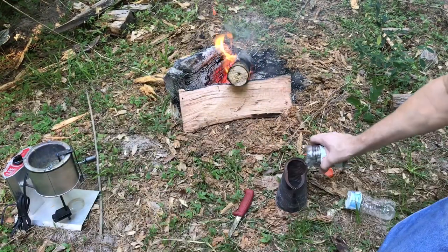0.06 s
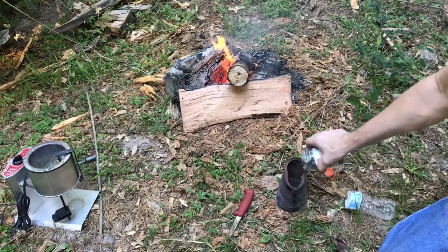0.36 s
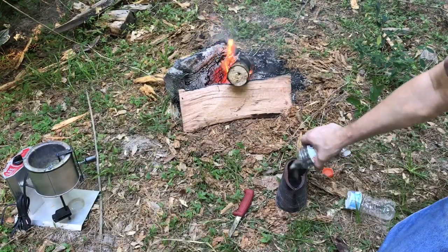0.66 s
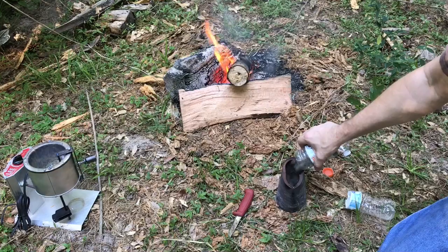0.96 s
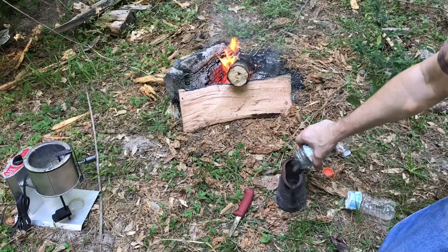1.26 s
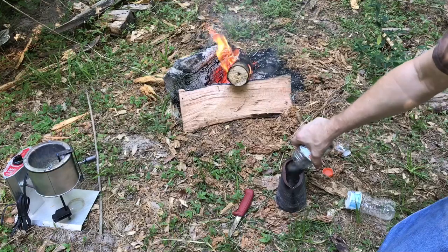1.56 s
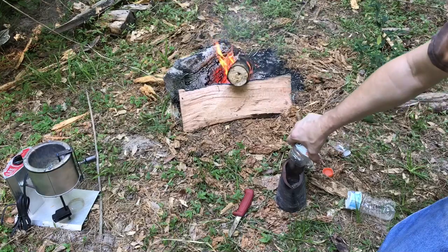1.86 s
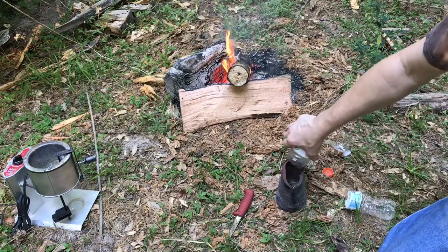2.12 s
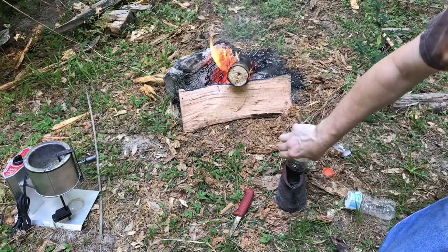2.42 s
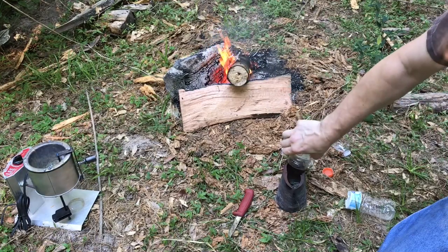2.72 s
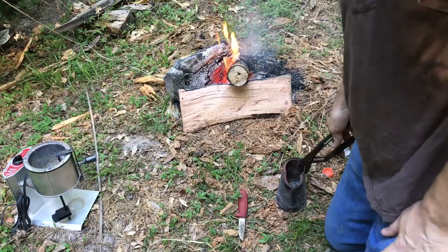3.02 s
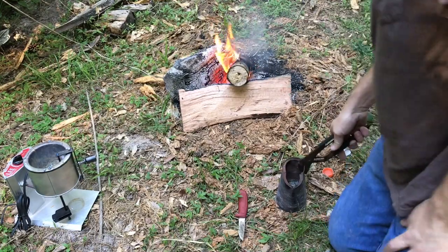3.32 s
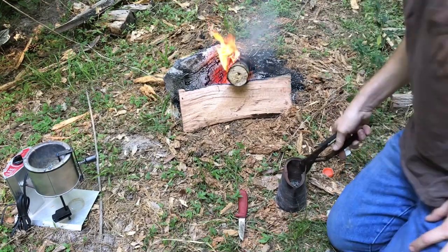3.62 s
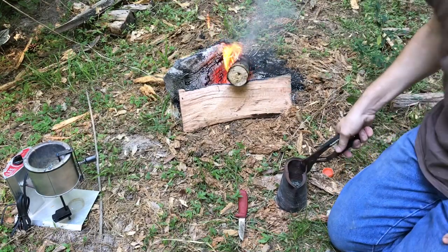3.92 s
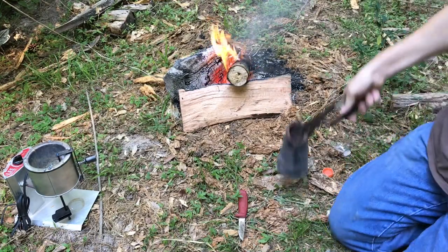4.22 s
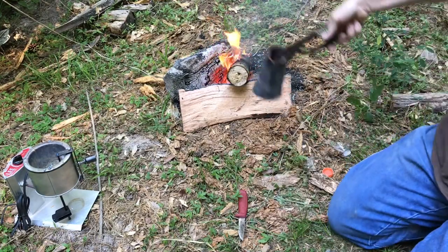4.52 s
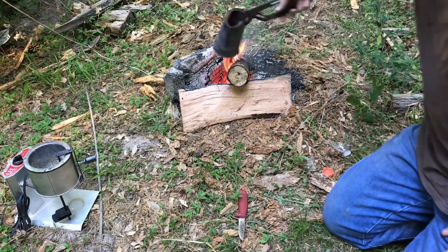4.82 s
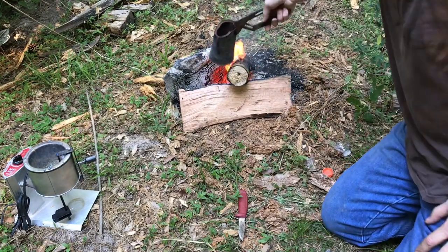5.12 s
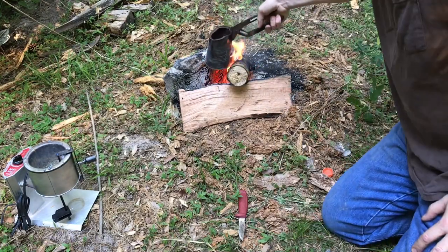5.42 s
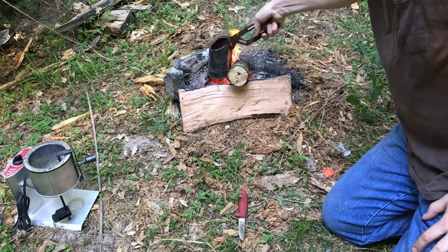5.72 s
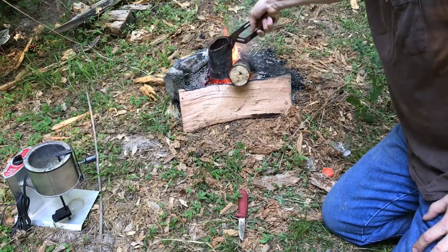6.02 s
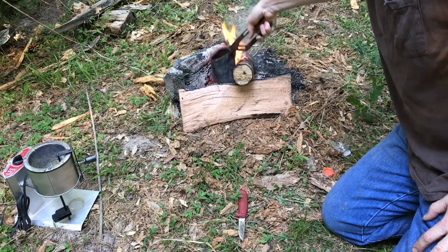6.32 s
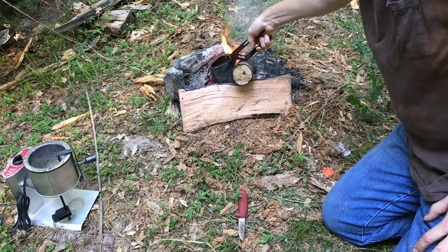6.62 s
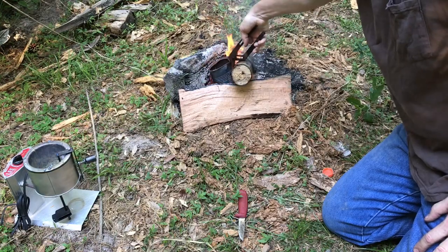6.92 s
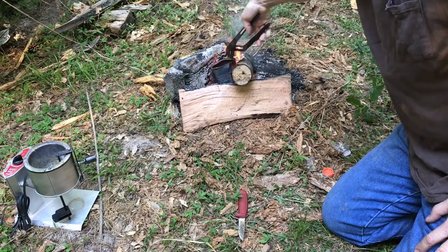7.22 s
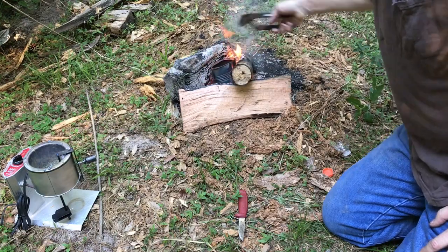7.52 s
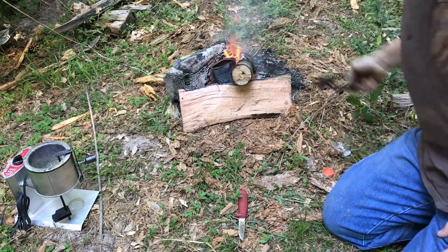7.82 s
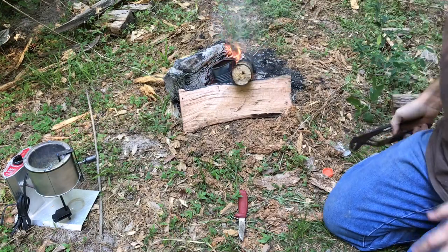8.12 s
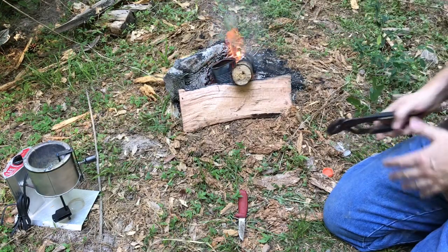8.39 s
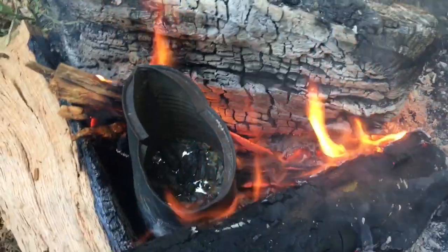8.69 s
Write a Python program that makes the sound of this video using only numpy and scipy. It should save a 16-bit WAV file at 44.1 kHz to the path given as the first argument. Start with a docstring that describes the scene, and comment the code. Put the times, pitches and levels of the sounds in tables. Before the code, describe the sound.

Outdoors, small metal weights pour from a bottle into a heavy metal can with a bright, dense clatter that thins to a few stray clicks. Pliers clink lightly on the can, clothes rustle, and the can crunches into charcoal and knocks against logs. A small wood fire snaps now and then, and a distant bird calls faintly over soft outdoor air. The handling sounds are near and fairly dry.

```python
"""Lead weights pour from a bottle and clatter into a heavy metal can, each impact exciting its modes.
Pliers grip the can, clothes rustle, and the can is carried to a small wood fire and worked down into
the embers, grinding charcoal and knocking on logs. The wood snaps as it burns, and a far bird calls over
outdoor air, a low hum and a drone. At the very end the flames rumble close by."""
import sys
import numpy as np
from scipy import signal
from scipy.fft import rfft, irfft, next_fast_len
from scipy.io import wavfile
from scipy.ndimage import uniform_filter1d

SR = 44100
rng = np.random.default_rng(int(sys.argv[2]) if len(sys.argv) > 2 else 0)


def put_to_file(sound):
    """Save the sound as 16-bit audio at rate SR, in the file named by the first command-line argument."""
    columns = np.atleast_2d(sound).T  # one column per channel
    safe = np.clip(columns, -1, 1)
    whole_steps = np.round(safe * 32767)
    wavfile.write(sys.argv[1], SR, whole_steps.astype(np.int16))


N = 386051
TIME = np.arange(N) / SR
HIT_TIME = TIME[:SR // 8]

# Levels are relative within a table; the functions apply further gains.
# spectra of the noises and impacts: frequency_hz, gain_db
AIR_SPECTRUM = [(30, -14.5), (75, -0.5), (161, -11.5), (461, -18.5), (889, -14.5), (2410, -30),
                (3870, -26.5), (4420, -29), (4910, -33), (9220, -30.5), (10500, -35.5), (16000, -32.5)]
FLAME_SPECTRUM = [(25, -7.5), (65, 0), (210, -24.5), (480, -29), (600, -45.5)]
CLOTH_SPECTRUM = [(1400, -1), (3600, 4.5), (12600, 3), (16000, -7)]
CHARCOAL_SPECTRUM = [(2100, -7), (3900, -4), (4800, -7), (6200, 0.5), (9000, 4.5), (12700, 3.5),
                     (15700, -1)]
CLASH_SPECTRUM = [(1200, -20.5), (2050, -5), (2500, -3), (4200, 0.5), (5000, -7), (6000, 1), (7000, -2),
                  (7800, -5.5), (9000, -4.5), (12000, -4), (15500, -8.5)]
THUD_SPECTRUM = [(190, -16), (450, -1), (800, -11), (1550, 0.5), (2000, -7)]

# resonances: pitch_hz, bandwidth_hz, gain_db
DRONE_BANDS = [(372.4, 16.3, 9.5), (720, 167, 1), (1017, 480, -4.5)]
INSECT_BANDS = [(4250, 340, 0.5), (11570, 1000, -5.5)]
LOG_MODES = [(610, 110, -2), (810, 70, 2), (1420, 200, -10), (3100, 250, -11)]
PLIER_MODES = [(3180, 120, -5), (3950, 180, 1), (6250, 600, -2), (8850, 800, 0)]
HELD_CAN_MODES = [(540, 60, 2), (605, 70, -2), (850, 150, -11), (1420, 140, -8), (1850, 260, -12)]  # the loaded can in the pliers
CAN_MODES = [(466, 42, 4.5), (590, 60, 3), (698, 45, 0), (912, 35, 0), (1013, 40, -1.5), (1190, 70, -3.5),
             (1393, 100, -1), (1530, 140, 0.5), (1741, 40, -5), (1875, 30, -6)]  # can and bottle during the pour
CLIP_MODES = [(2349, 35, -1), (2470, 70, -2), (2650, 100, 3), (2822, 50, -1), (3525, 40, 0), (3885, 50, -1),
              (6874, 130, -1), (8235, 30, 1), (9265, 55, -2), (9690, 100, -2)]  # the weights and their steel clips

# envelopes: time_s, level_db
AIR_LEVELS = [(8.5, -56.5), (8.56, -64)]
HUM_LEVELS = [(2.7, -60.5), (3.3, -55), (7, -51.5), (7.8, -57.5)]
DRONE_LEVELS = [(2.8, -66.5), (7, -61.5), (8.52, -68)]
FLAME_LEVELS = [(8.53, -74.5), (8.56, -47), (8.72, -44)]
FLOW_LEVELS = [(0.6, -59.5), (0.77, -47.5), (0.88, -43.5), (1.0, -34.5), (1.22, -32.5), (1.28, -48.5),
               (1.4, -41), (1.8, -40), (2.0, -88), (2.14, -56), (2.32, -84)]  # weights sliding out of the bottle

# movements: start_s, end_s, level_db
CLOTH_SWISHES = [(0.16, 0.33, -55.5), (2.98, 3.22, -48), (3.31, 3.49, -51), (3.5, 3.95, -55.5),
                 (3.95, 4.7, -61.5)]
CHARCOAL_SHOVES = [(5.64, 5.98, -53), (5.99, 6.32, -50), (6.25, 6.64, -45), (6.74, 6.83, -50),
                   (6.84, 7.0, -44.5), (6.99, 7.26, -42.5)]
LOAD_RATTLES = [(2.9, 3.2, -57.5), (4.45, 5.0, -59.5)]

# bird calls: start_s, level_db
BIRD_CALLS = [(1.88, -49), (2.28, -54.5), (2.64, -54), (4.38, -53.5), (5.405, -55.5), (5.75, -54),
              (6.64, -54), (6.88, -58)]
# snaps of burning wood, charcoal and twigs: start_s, level_db, pitch_hz
WOOD_SNAPS = [(0.1037, -26, 7100), (0.6595, -19, 5800), (2.217, -26.5, 2170), (3.446, -29, 3840),
              (3.579, -31.5, 4000), (3.712, -30, 2900), (3.875, -36, 7000), (4.0157, -37, 2990),
              (4.5239, -31, 6540), (6.082, -31.5, 4100), (6.3776, -21.5, 5750), (6.436, -30, 6000),
              (6.6085, -23, 3860), (6.795, -35, 5150), (6.8667, -23, 9100), (7.043, -30, 3970),
              (7.0998, -26, 3800), (7.546, -23.5, 5840)]
# stray weights shifting in the bottle and can: start_s, clash_db
STRAY_WEIGHTS = [(0.211, -36), (0.262, -45.5), (0.486, -33.5), (2.083, -33.5), (2.189, -38.5), (2.246, -41),
                 (2.284, -38), (2.455, -41), (2.748, -36.5), (2.805, -41.5)]
# weights landing in the can: start_s, clash_db
WEIGHT_DROPS = [(0.788, -18), (0.798, -13), (0.826, -18), (0.8965, -4), (0.9506, -9.5), (0.965, -6.5),
                (0.9759, -5), (0.998, -16.5), (1.058, -15.5), (1.0863, -15.5), (1.0933, -16.5),
                (1.127, -17.5), (1.1458, -18), (1.1817, -20), (1.2084, -12), (1.224, -18), (1.295, -14),
                (1.303, -15.5), (1.3384, -21.5), (1.345, -14), (1.372, -21.5), (1.454, -19.5),
                (1.478, -20.5), (1.495, -25.5), (1.5838, -22.5), (1.6179, -21), (1.6592, -13),
                (1.7021, -18), (1.719, -13.5), (1.7507, -20.5), (1.817, -35), (1.863, -23), (1.903, -17),
                (1.916, -15), (1.94, -23.5), (1.984, -16.5), (2.045, -18)]
# impacts and the struck body's answer: start_s, contact_db, body_db
PLIER_KNOCKS = [(2.887, -29.5, -65), (2.9143, -29.5, -53.5), (3.0114, -25.5, -53), (3.1494, -51, -50.5),
                (3.2864, -38.5, -49.5), (4.2327, -44, -47), (4.574, -43.5, -48), (4.7, -50, -50.5),
                (4.872, -46.5, -52.5), (5.2955, -28.5, -40.5), (5.6243, -32, -57), (5.881, -20.5, -65),
                (5.894, -25.5, -47), (6.4883, -25.5, -60), (6.758, -27, -49.5), (6.8823, -31, -51)]  # can against pliers; the soft knocks at 4.5-4.9 s are the load shifting inside the carried can
LOG_LANDINGS = [(7.1434, -20.5, -29), (7.1986, -30.5, -37)]  # can onto logs
WALL_HITS = [(0.836, -17, -21), (0.905, -2.5, -13), (0.939, -19.5, -22), (1.234, -16, -23.5)]  # weights against the bare can wall
# brief dips of the whole sound: time_s
LEVEL_DIPS = [2.869, 8.535]


def from_db(db):
    """Amplitude grows tenfold with every 20 dB."""
    return 10 ** (np.asarray(db) / 20)


def unit_rms(x):
    """Normalisation to unit mean power."""
    return x / np.sqrt(np.mean(x ** 2) + 1e-20)


def as_hit(x):
    """Normalisation to the energy of ten milliseconds at unit rms."""
    return x / np.sqrt(np.sum(x ** 2) / (SR / 100) + 1e-20)


def level(rows):
    """An envelope interpolated in amplitude, silent outside its rows."""
    times, db = np.transpose(rows)
    return np.interp(TIME, times, from_db(db), left=0, right=0)


def held_level(rows):
    """An envelope interpolated in decibels, held at both ends."""
    return from_db(np.interp(TIME, *np.transpose(rows)))


def strokes(rows):
    """Half-sine envelopes: friction noise swells and fades with the speed of a stroke."""
    return sum(from_db(db) * np.sin(np.pi * np.clip((TIME - start) / (end - start), 0, 1))
               for start, end, db in rows)


def drift(per_s):
    """Random modulation of unit rms, interpolated between knots."""
    knots = rng.standard_normal(4000)
    return unit_rms(np.interp(TIME * per_s, np.arange(len(knots)), knots))


def add(out, start_s, sound):
    """Superposition: a sound adds to the mix from its start time."""
    start = int(start_s * SR)
    out[start:start + len(sound)] += sound[:N - start]


def colour(x, spectrum):
    """A minimum-phase filter follows the spectrum and falls 18 dB per octave outside it."""
    size = next_fast_len(len(x) + SR // 10) // 2 * 2
    octave = np.log2(np.maximum(np.fft.rfftfreq(size, 1 / SR), 5))
    hz, db = np.transpose(spectrum)
    outside = np.abs(octave - np.clip(octave, np.log2(hz[0]), np.log2(hz[-1])))
    gain_db = np.interp(octave, np.log2(hz), db) - 18 * np.minimum(outside, 3)
    cepstrum = irfft(np.log(from_db(gain_db)))
    cepstrum[1:size // 2] *= 2  # folding the cepstrum makes the filter causal
    cepstrum[size // 2 + 1:] = 0
    return irfft(np.exp(rfft(cepstrum)) * rfft(x, size))[:len(x)]


def resonate(x, modes):
    """Modal response: damped resonators in parallel, of alternating sign."""
    out = 0
    for k, (hz, width_hz, db) in enumerate(modes):
        radius = np.exp(-np.pi * width_hz / SR)
        gain = (-1) ** k * from_db(db) * (1 - radius ** 2) / 2
        feedback = [1, -2 * radius * np.cos(2 * np.pi * hz / SR), radius ** 2]
        out = out + gain * signal.lfilter([1, 0, -1], feedback, x + 1e-18)
    return out


def random_modes(low_hz, high_hz, width_hz, count):
    """An irregular piece has inharmonic modes, drawn here on a log-frequency scale."""
    return [(hz, width_hz, 0) for hz in low_hz * (high_hz / low_hz) ** rng.random(count)]


def grains(per_s, spread_db, size=N):
    """Shot noise: independent tiny contacts of uneven strength."""
    born = rng.random(size) < per_s / SR
    signs = rng.choice([-1, 1], size)
    strengths = from_db(spread_db * np.minimum(rng.exponential(1, size), 4))
    return unit_rms(born * signs * strengths)


def chatter(t60_s, per_s, first):
    """Impact excitation: one firm contact, then small ones that decay exponentially."""
    attack = np.minimum(.3 + HIT_TIME / .0015, 1)
    burst = grains(per_s, 2.5, size=len(HIT_TIME)) * from_db(-60 * HIT_TIME / t60_s) * attack
    burst[0] += first
    return burst


def outdoors():
    """Ambient noise: broadband air, a modulated hum, a narrowband drone and an early insect-like hiss."""
    air = held_level(AIR_LEVELS) * unit_rms(colour(rng.standard_normal(N), AIR_SPECTRUM))
    hum_gain = held_level(HUM_LEVELS) * from_db(2 * drift(27))
    hum = hum_gain * np.sin(2 * np.pi * 58.5 * TIME + .5 * drift(19))
    drone = level(DRONE_LEVELS) * unit_rms(resonate(rng.standard_normal(N), DRONE_BANDS))
    hiss = unit_rms(resonate(rng.standard_normal(N), INSECT_BANDS))
    return air + hum + drone + from_db(-65.5) * (TIME < LEVEL_DIPS[0]) * hiss


def reflections(x, tail, echo_db):
    """Reverberation: the direct sound plus its convolution with a tail of unit energy."""
    return x + from_db(echo_db) * signal.fftconvolve(x, tail / np.linalg.norm(tail))[:N]


def yard(x, t60_s=.22):
    """Reflection from ground and trees returns a faint, dull tail."""
    noise = colour(rng.standard_normal(SR), [(250, 0), (2500, 0), (14000, -16)])
    return reflections(x, noise * from_db(-60 * TIME[:SR] / t60_s), echo_db=-23)


def bird(call_s=.125, top_s=.048, top_hz=1475, sag_hz=250, arch_s=.06, woods_t60_s=1.5):
    """Frequency modulation: a far, wavering call arches up and falls, and the trees scatter it."""
    out, t = np.zeros(N), TIME[:int(call_s * SR)]
    arch_hz = top_hz - sag_hz * (1 - np.exp(-((t - top_s) / arch_s) ** 2))
    envelope = np.sin(np.pi * t / t[-1])
    for start_s, db in BIRD_CALLS:
        detune = .012 * rng.standard_normal()
        waver = .018 * unit_rms(uniform_filter1d(rng.standard_normal(len(t)), 120))
        phase = 2 * np.pi * np.cumsum(arch_hz * (1 + detune + waver)) / SR
        add(out, start_s, from_db(db) * envelope * np.sin(phase))
    echo_envelope = from_db(-60 * TIME[:SR] / woods_t60_s) * np.minimum(TIME[:SR] / .03, 1)
    return reflections(out, rng.standard_normal(SR) * echo_envelope, echo_db=-2)


def fire():
    """Combustion noise: flames rumble, and each snap of wood excites one broad resonance."""
    out = held_level(FLAME_LEVELS) * unit_rms(colour(rng.standard_normal(N), FLAME_SPECTRUM))
    for start_s, db, pitch_hz in WOOD_SNAPS:
        crack = chatter(t60_s=.023, per_s=2300, first=7.5)
        snap = colour(crack, CLASH_SPECTRUM) + resonate(crack, [(pitch_hz, 700, 8)])
        add(out, start_s, from_db(db - 21.5) * as_hit(snap))
    return out


def cloth():
    """Friction between fibres gives a fine hiss with each swish."""
    fibres = grains(per_s=7000, spread_db=4.5) * from_db(1.8 * drift(55))
    return strokes(CLOTH_SWISHES) * unit_rms(colour(fibres, CLOTH_SPECTRUM))


def charcoal():
    """Brittle fracture: charcoal crumbles under the can, each piece ringing at its own pitch."""
    crumbs = grains(per_s=4500, spread_db=3.3) * from_db(2 * drift(45))
    pieces = random_modes(3700, 15500, width_hz=200, count=20)
    struck_piece = rng.integers(0, len(pieces), N)
    rings = sum(from_db(4.5 * drift(16)) * resonate(crumbs * (struck_piece == k), [piece])
                for k, piece in enumerate(pieces))
    grit = unit_rms(colour(crumbs, CHARCOAL_SPECTRUM)) + .6 * unit_rms(rings)
    return from_db(-2) * strokes(CHARCOAL_SHOVES) * grit


def load_rattle():
    """Forced vibration: faint contacts of the shifting load keep the carried can ringing."""
    contacts = grains(per_s=500, spread_db=2)
    return strokes(LOAD_RATTLES) * unit_rms(resonate(contacts, HELD_CAN_MODES))


def knocks(rows, modes, clink_gain_db, body_gain_db):
    """Damped free vibration: the pliers clink and the struck body gives a short hollow note."""
    out = np.zeros(N)
    for start_s, clink_db, body_db in rows:
        contacts = chatter(t60_s=.075, per_s=5000, first=2)
        clink = colour(contacts, CLASH_SPECTRUM) + resonate(contacts, PLIER_MODES)
        body = resonate(chatter(t60_s=.055, per_s=2000, first=5), modes)
        add(out, start_s, from_db(clink_db + clink_gain_db) * as_hit(clink))
        add(out, start_s, from_db(body_db + body_gain_db) * as_hit(body))
    return out


def sliding():
    """Dense collisions merge into noise as the weights tumble down the bottle neck."""
    contacts = grains(per_s=1500 * from_db(5 * drift(70)), spread_db=3)
    clash = unit_rms(colour(contacts, CLASH_SPECTRUM))
    ring = unit_rms(resonate(contacts, CAN_MODES))
    return level(FLOW_LEVELS) * (from_db(-2) * clash + from_db(-3.5) * ring)


def trickle_hits(per_s=34, over_flow_db=7.5, spread_db=1.5):
    """Jittered arrivals: one small weight falls in each time slot, as hard as the flow is strong."""
    slots = np.arange(200)
    times = FLOW_LEVELS[0][0] + (slots + rng.random(len(slots))) / per_s
    times = times[times < FLOW_LEVELS[-1][0]]
    flow_db = 20 * np.log10(np.interp(times, TIME, level(FLOW_LEVELS)) + 1e-9)
    clash_db = flow_db + over_flow_db + spread_db * rng.standard_normal(len(times))
    return [(start_s, db, db - 6) for start_s, db in zip(times, clash_db)]


def drop_hits(empty_db=-14.5, follows_clash=.82, fill_db_per_s=6, fill_start_s=1, fill_end_s=1.47):
    """Damping by the load: the can answers each landing weight more weakly as it fills."""
    rows = []
    for start_s, clash_db in WEIGHT_DROPS:
        filled_s = np.clip(start_s, fill_start_s, fill_end_s) - fill_start_s
        rows.append((start_s, clash_db, empty_db + follows_clash * clash_db - fill_db_per_s * filled_s))
    return rows


def weights(rows, clash_gain_db, body_gain_db, settle_t60_s, contact_hz):
    """Impact excites modes: each weight clashes on the pile, rings and shakes the can."""
    out = np.zeros(N)
    pole = np.exp(-2 * np.pi * contact_hz / SR)  # a slow, gentle contact has less treble
    for start_s, clash_db, body_db in rows:
        clash = as_hit(colour(chatter(settle_t60_s, per_s=7000, first=2.5), CLASH_SPECTRUM))
        clip_ring = as_hit(resonate(chatter(t60_s=.068, per_s=8700, first=6.6), CLIP_MODES))
        own_blow = chatter(t60_s=.03, per_s=5000, first=8)
        own_ring = as_hit(resonate(own_blow, random_modes(2400, 14000, width_hz=80, count=8)))
        metal = clash + from_db(-3.5) * clip_ring + from_db(-2.5) * own_ring
        softened = signal.lfilter([1 - pole], [1, -pole], metal)
        add(out, start_s, from_db(clash_db + clash_gain_db) * softened)

        knock = chatter(t60_s=.051, per_s=3700, first=1.2)
        bump_db = -22 + 12.6 * min(start_s, 2)  # the fuller the can, the duller the thud
        thud = as_hit(colour(knock, THUD_SPECTRUM) + resonate(knock, [(295, 200, bump_db)]))
        can_blow = chatter(t60_s=.072, per_s=2000, first=12)
        can = as_hit(resonate(can_blow, CAN_MODES + random_modes(500, 1700, width_hz=88, count=2)))
        add(out, start_s, from_db(body_db + body_gain_db) * (can + thud))
    return out


def scene():
    """Superposition of all sources at one point; the weights and can also echo in the yard."""
    pour = weights(drop_hits() + WALL_HITS, clash_gain_db=-14.5, body_gain_db=-3,
                   settle_t60_s=.064, contact_hz=20000)
    pour += sliding()
    pour += weights(trickle_hits(), clash_gain_db=-15, body_gain_db=-3.5,
                    settle_t60_s=.04, contact_hz=12000)
    stray_hits = [(start_s, db, db - 9) for start_s, db in STRAY_WEIGHTS]
    strays = weights(stray_hits, clash_gain_db=-10, body_gain_db=-4, settle_t60_s=.087, contact_hz=4120)
    pliers = knocks(PLIER_KNOCKS, HELD_CAN_MODES, clink_gain_db=-16, body_gain_db=1.5)
    logs = knocks(LOG_LANDINGS, LOG_MODES, clink_gain_db=-11, body_gain_db=.5)
    impacts = yard(pour + strays + load_rattle() + pliers + logs)
    return (impacts + cloth() + charcoal() + fire() + bird() + outdoors())[None]


def record(dry, low_hz=36, high_hz=16000, ceiling=1.3):
    """The level dips twice; band limiting cuts deep bass and top, and saturation rounds the peaks."""
    for dip_s in LEVEL_DIPS:
        dry = dry * np.clip(np.abs(TIME - dip_s) / .022, .1, 1)
    dry = signal.sosfilt(signal.butter(4, low_hz, "high", fs=SR, output="sos"), dry)
    rounded = ceiling * np.tanh(dry / ceiling)
    return signal.sosfilt(signal.ellip(12, .1, 70, high_hz, fs=SR, output="sos"), rounded)


dry = scene()
out = record(dry)
put_to_file(out)
```